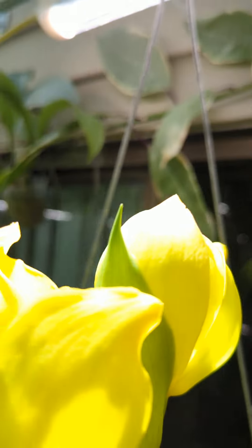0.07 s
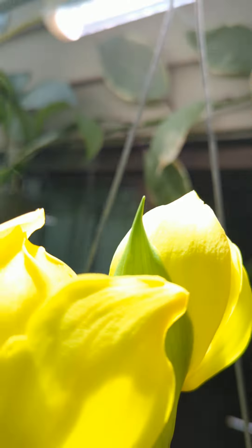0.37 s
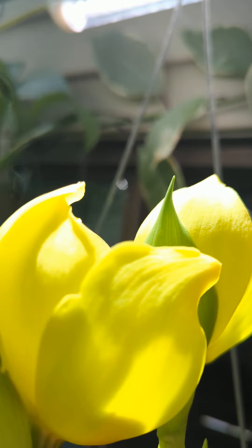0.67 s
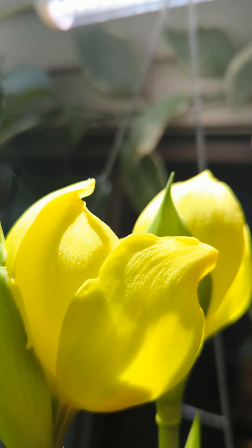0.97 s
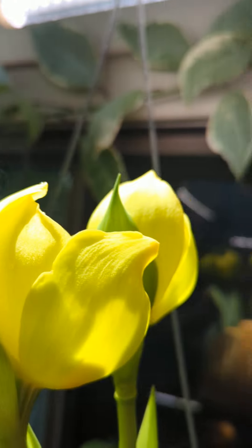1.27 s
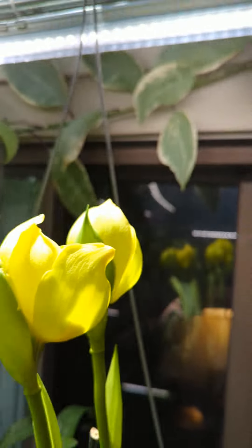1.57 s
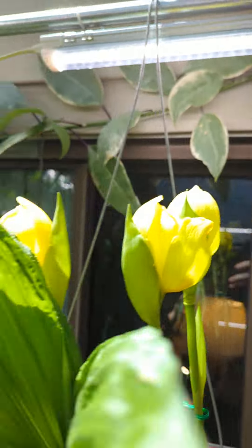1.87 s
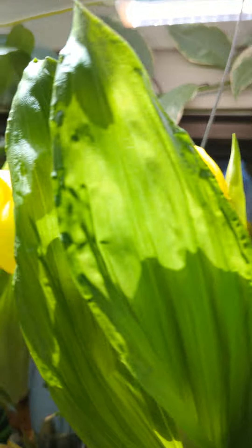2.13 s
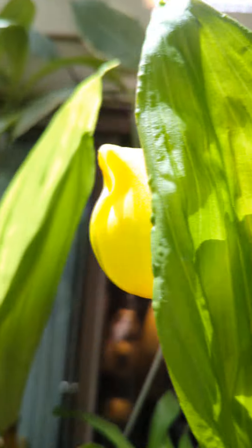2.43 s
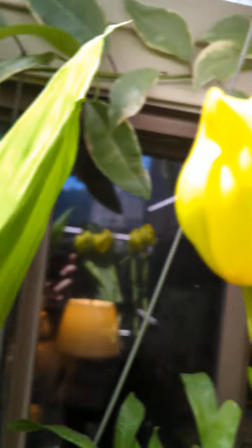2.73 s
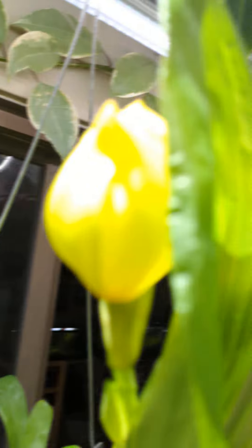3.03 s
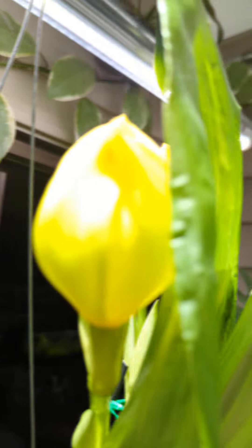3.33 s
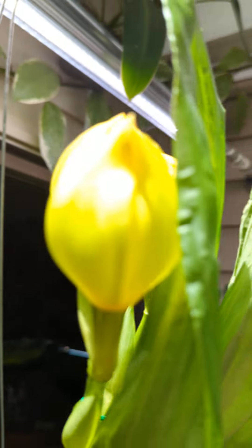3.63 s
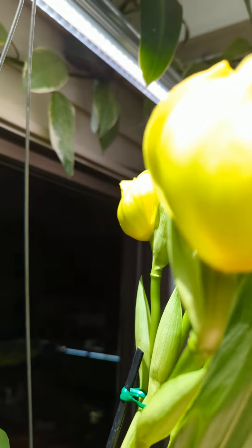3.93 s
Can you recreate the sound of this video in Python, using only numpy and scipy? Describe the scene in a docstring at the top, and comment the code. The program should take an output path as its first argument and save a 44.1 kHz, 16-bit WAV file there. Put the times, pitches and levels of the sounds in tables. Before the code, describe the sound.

Two fans hum low and steady in a plant room, with a thin whine and soft rushing air, the tone slowly shifting as the microphone moves. Faint close handling ticks are scattered through the first 2.5 seconds, while the air grows slightly fuller. From about 2.4 to 3.6 seconds a leaf or sleeve brushes softly on the right, followed by one light, dull bump at 3.7 seconds.

```python
"""Two fans hum in a glazed plant room, their lowest notes beating against each other.
The stereo microphone rides on a hand-held camera, carried among the pots and through the room's
standing waves, so the hum slowly changes colour. Close up come faint ticks of handling and, on the
right, soft brushes of leaf or sleeve and one dull bump. A soft rush of air lies behind it all."""
import sys
import numpy as np
from scipy import signal
from scipy.fft import rfft, irfft, next_fast_len
from scipy.io import wavfile
from scipy.ndimage import uniform_filter1d, map_coordinates

SR = 44100
rng = np.random.default_rng(int(sys.argv[2]) if len(sys.argv) > 2 else 0)


def persist_wave(psi):
    """Save psi, clipped to +-1, as 16-bit WAV."""
    counts = np.round(np.clip(psi, -1, 1) * 32767).astype(np.int16)
    wavfile.write(sys.argv[1], SR, np.atleast_2d(counts).T)


N = 176400

# When the microphone passes each of five places in the room: t/s
PLACE_TIMES = [.4, 1.4, 2.15, 2.8, 3.7]
FAN_HZ, MOTOR_HZ, MAINS_HZ = 35.47, 58.76, 60.05


# Loud fan's partials: shaft multiple, level/dB at each of the five places, left-right/dB
FAN_PARTIALS = [(2, -32.5, -32.5, -33.5, -35.5, -34.5, 0.83), (4, -44.5, -46, -49.5, -48.5, -52, -1.7),
                (5, -58, -62.5, -53.5, -52, -48.5, .2), (6, -61, -52, -49, -43.5, -48, 0.01),
                (8, -59.5, -55, -55, -75, -75, 0.66), (9, -66, -62, -59, -58, -77, 0.16)]

def loud_fan():
    """The main fan hums at multiples of its shaft rate."""
    return hum(shaft_turns(FAN_HZ), FAN_PARTIALS)


# Faster motor's partials: shaft multiple (rounded in use), level/dB at the five places, left-right/dB
MOTOR_PARTIALS = [(1, -44.5, -45, -48, -46, -48.5, -1), (2, -54, -55, -56, -51, -50, 7),
                  (4, -55, -53, -51.5, -54.5, -58, -3.8), (5, -64, -60, -54, -61, -58.5, 1),
                  (6, -61, -58, -72, -73, -56, 3), (8, -52, -55, -60.5, -54, -52.5, 1),
                  (9, -57.5, -58, -65, -65, -75, 4), (14, -73, -75, -68, -71, -69, -7),
                  (22, -74, -73, -70, -70, -63.5, -9), (23.93, -71, -67.5, -69.5, -68, -72, -6),
                  (31, -82, -77, -72, -72, -73, 3)]
# Its whine at the microphone: t/s, level/dB
WHINE_LEVELS = [(.1, -58), (.3, -58), (.85, -59), (1.08, -62.5), (1.24, -55.5), (1.38, -69), (1.58, -62.5),
                (1.7, -57), (2.08, -55), (2.2, -65), (2.55, -64), (3.1, -65), (3.35, -62), (3.65, -60),
                (4, -62)]

def fast_motor():
    """The second fan's motor: a hum, and a thin whine whose short standing waves pass quickly."""
    turns = shaft_turns(MOTOR_HZ)
    whine_db = np.interp(clock(), *np.transpose(WHINE_LEVELS))
    whine = amp(whine_db) * partial(turns, multiple=18, lean_db=-4)
    return hum(turns, MOTOR_PARTIALS) + whine


# Windings' partials: mains multiple, level/dB at the five places, left-right/dB
MAINS_PARTIALS = [(2, -49.5, -53.5, -61, -58, -60, 1), (8, -56, -55, -68, -75, -69, -0.74)]

def mains_buzz():
    """The windings buzz at even multiples of the mains frequency."""
    return hum(MAINS_HZ * clock(), MAINS_PARTIALS)


def hum(turns, partials):
    """Each partial swells and fades as the microphone crosses its standing wave."""
    out = np.zeros((2, N))
    lowest = partials[0][0]
    for multiple, *place_db, lean_db in partials:
        flutter_db = 1.5 * (1 - lowest / multiple) * wobble(7)  # higher overtones are less steady
        out += amp(walk(place_db) + flutter_db) * partial(turns, round(multiple), lean_db)
    return out


def shaft_turns(rate_hz, drift=.0012):
    """Turns made so far by a shaft whose speed drifts slightly."""
    return np.cumsum(rate_hz * (1 + drift * wobble(5.017))) / SR


def partial(turns, multiple, lean_db, skew_rad_per_khz=.96):
    """One harmonic at rms 1, reaching the two microphone ports a little out of step."""
    khz = multiple * turns[-1] * SR / N / 1000
    skew = skew_rad_per_khz * khz * rng.choice([-1, 1]) * np.array([[.5], [-.5]])
    phase = 2 * np.pi * (multiple * turns + rng.random())
    return pan(lean_db) * np.sqrt(2) * np.sin(phase + skew)


# Ticks on the camera body: t/s, level/dB, centre f/Hz, width/octaves, t60/s, left-right/dB
GRIP_SLIPS = [(.158, -65, 9500, 0.6, .2, -1), (.285, -63.5, 11400, 0.88, .2, 0),
              (.43, -68.5, 10900, 0.92, 0.84, 0), (.612, -73, 6900, .2, .15, 2),
              (.712, -63, 8950, 0.69, 0.18, 0), (.815, -63, 5500, .8, 0.16, -1),
              (.96, -72, 8000, .8, .4, 4), (1.30, -71, 10000, .8, .3, 6), (1.34, -62, 7500, 1, 0.3, 0),
              (1.455, -71, 6000, .6, 0.17, -1), (1.645, -62, 3600, 0.72, 0.17, -2),
              (1.647, -61, 2850, .05, 0.23, -5), (1.74, -72, 12000, .6, .2, 4),
              (2.206, -57.5, 14500, 0.33, .2, -3), (2.24, -65, 6000, .8, 0.18, -4),
              (2.38, -59, 10500, .6, 0.17, 2), (2.59, -66, 5900, .1, .15, -4),
              (3.918, -65, 11700, 0.22, 0.18, 0)]
RUSTLE_CRACKLE = .34  # grains' share of the mix in ticks and brushes

def handling_ticks():
    """Each small slip of the grip is a crackly puff, right at the microphone."""
    out = np.zeros((2, N))
    for start_s, db, centre_hz, octaves, t60, lean_db in GRIP_SLIPS:
        slip = noise(lambda hz: band(hz, centre_hz, octaves), RUSTLE_CRACKLE)
        rough_db = 1.5 * wobble(400)
        out += amp(db + rough_db) * puff(start_s, rise_s=.0067, t60=t60) * pan(lean_db) * slip
    return out


# Strokes close on the right: peak t/s, half length/s, level/dB, centre f/Hz, left-right/dB
BRUSH_STROKES = [(2.46, 0.076, -64.5, 6500, -5), (2.614, 0.065, -66, 5900, -3),
                 (2.713, 0.024, -59, 5570, -9), (3.034, 0.083, -62, 5560, -8),
                 (3.12, 0.033, -57, 4200, -12), (3.24, 0.093, -65.5, 5470, -3), (3.37, .03, -63, 6360, -9),
                 (3.46, 0.037, -68, 6500, -10), (3.618, .02, -56.5, 5170, -20)]
# Colour of the rubbing: f/Hz, relative level/dB
BRUSH_SPECTRUM = [(500, -6), (1500, 19), (2500, 10), (3400, 2.5), (4600, 4.5), (6300, -3.5), (8000, -3),
                  (9500, -1), (11500, -6.5), (15500, -5)]

def brushes():
    """Leaf or sleeve rubs beside the right port in grainy strokes that swell and fade."""
    out = np.zeros((2, N))
    for peak_s, half_s, db, centre_hz, lean_db in BRUSH_STROKES:
        swell = np.exp(-.5 * ((clock() - peak_s) / half_s) ** 2)
        rub = noise(lambda hz: band(hz, centre_hz, .89) * colour(BRUSH_SPECTRUM, hz), RUSTLE_CRACKLE)
        rough_db = 1.6 * wobble(150)
        out += amp(db + rough_db) * swell * pan(lean_db) * rub
    return out


# Colour of the bump: f/Hz, relative level/dB
BUMP_SPECTRUM = [(500, -16), (900, 0), (1250, 2), (1800, 3), (2300, 4), (2800, -15), (5000, -40)]

def bump():
    """One light, dull bump on the right, perhaps against a pot, with a short tail in the room."""
    thud = noise(lambda hz: colour(BUMP_SPECTRUM, hz))
    return amp(-44) * puff(start_s=3.688, rise_s=.0034, t60=.24) * pan(-6) * thud


# Air heard all over the room: f/Hz, relative level/dB
ROOM_AIR_SPECTRUM = [(20, -10), (38, -14), (52, -3), (68, 11), (90, -2), (130, -2), (200, -4.5),
                     (330, -3.5), (430, -5), (620, -11.5), (870, -15), (1080, -13.5), (1450, -21.5),
                     (2050, -21), (2650, -26), (3300, -34), (4300, -34), (5200, -41.5), (7000, -44.5),
                     (8000, -45.5), (9200, -46), (15500, -49)]
# Narrow hisses of the air path: centre f/Hz, half width/Hz, level/dB at the five places
AIR_HISSES = [(727, 22, -57, -58, -66, -65.5, -70), (829, 5.4, -68.5, -69, -57.5, -61, -63.5),
              (1390, 160, -69, -74, -62.5, -59, -68.5), (3885, 46, -69.5, -71.5, -68.5, -70.5, -71.5)]
# Fuller air heard from nearer: f/Hz, relative level/dB
NEAR_AIR_SPECTRUM = [(30, -30), (120, -14.5), (190, 1), (300, -4.5), (450, -13.5), (700, -19.5),
                     (1300, -23), (2200, -25), (3200, -38), (6000, -53), (15000, -59)]

def air_rush():
    """The fans' steady rush and narrow hisses; a fuller rush grows as the microphone moves on."""
    rush = amp(-42.5) * noise(lambda hz: colour(ROOM_AIR_SPECTRUM, hz))
    for centre_hz, half_width_hz, *place_db in AIR_HISSES:
        hiss = noise(lambda hz: (1 + ((hz - centre_hz) / half_width_hz) ** 2) ** -.6)
        rush += amp(walk(place_db)) * hiss
    nearness = np.interp(clock(), [.97, 2.55], [0, 1])
    rush += nearness * amp(-47) * noise(lambda hz: colour(NEAR_AIR_SPECTRUM, hz))
    return turbulence(rush, depth_db=1.0)


def turbulence(rush, depth_db):
    """Uneven airflow: patches of random gain in time and frequency."""
    spectra = signal.stft(rush, nperseg=1024)[2]
    patches = uniform_filter1d(rng.standard_normal(spectra.shape[1:]), size=10, axis=0)
    patches = uniform_filter1d(patches, size=8, axis=1)
    return signal.istft(spectra * amp(depth_db * unit(patches)), nperseg=1024)[1][:, :N]


# Likeness of noise at the two ports: f/Hz, left-right correlation
PORT_CORRELATION = [(60, 0.93), (150, 0.94), (330, 0.87), (700, 0.33), (1400, 0.067), (3000, 0.045),
                    (12000, 0.083)]

def noise(response, crackle=0, grains_per_s=1100):
    """Coloured, optionally grainy stereo noise at rms 1: alike in the bass, unrelated in the treble."""
    hz = np.fft.rfftfreq(N, 1 / SR)
    spread = np.arccos(np.clip(log_interp(PORT_CORRELATION, hz), -1, 1)) / 2
    source = rng.standard_normal((2, N))
    if crackle:
        grains = unit(rng.standard_normal((2, N)) * (rng.random((2, N)) < grains_per_s / SR))
        source = (1 - crackle) * source + crackle * grains
    mid, side = irfft(rfft(source) * response(hz) * [np.cos(spread), np.sin(spread)], N)
    return unit(np.array([mid + side, mid - side]))


def walk(place_db):
    """Level/dB along the microphone's path through the five places."""
    return np.interp(clock(), PLACE_TIMES, place_db)


def puff(start_s, rise_s, t60):
    """An envelope that rises fast and dies away."""
    age = np.maximum(clock() - start_s, 0)
    return np.minimum(age / rise_s, 1) * amp(-60 * np.maximum(age - rise_s, 0) / t60)


def wobble(knots_per_s):
    """A smooth random curve."""
    position = clock() * knots_per_s
    return map_coordinates(rng.standard_normal(int(position[-1]) + 4), [position], mode="nearest")


def band(hz, centre_hz, octaves):
    """A bell-shaped band on a log axis."""
    return np.exp(-.5 * (np.log2((hz + 1) / centre_hz) / octaves) ** 2)


def colour(spectrum, hz):
    """Gain at hz from (f/Hz, level/dB) points."""
    return amp(log_interp(spectrum, hz))


def log_interp(points, hz):
    """Join (f/Hz, value) points on a log axis."""
    point_hz, values = np.transpose(points)
    return np.interp(np.log(hz + 1), np.log(point_hz + 1), values)


def pan(lean_db):
    """Left and right gains of mean power 1; positive leans left."""
    return unit(amp([[lean_db / 2], [-lean_db / 2]]))


def amp(db):
    """Decibels to gain."""
    return 10 ** (np.asarray(db) / 20)


def unit(x):
    """Scale to rms 1."""
    return x / np.sqrt(np.mean(x ** 2) + 1e-20)


def clock():
    """Each sample's t/s."""
    return np.arange(N) / SR


def scene():
    """Both fans and their air out in the room, and the small sounds close to the microphone."""
    fans = loud_fan() + fast_motor() + mains_buzz()
    return fans + air_rush() + handling_ticks() + brushes() + bump()


# Ripple of the microphone ports: f/Hz, gain/dB
PORT_RIPPLE = [(5700, 0), (6250, 7), (6800, 1), (7350, 3.5), (7800, -2), (8200, -4.5), (8500, 0.5),
               (9600, -1.5), (10200, -1), (10700, -2.5), (11400, 0), (12400, -0.5), (14000, -3),
               (14900, -0.5)]

def record(dry, top_hz=15750):
    """The microphone ports ripple the treble; nothing passes above the band limit."""
    padded = next_fast_len(N + 8192)
    hz = np.fft.rfftfreq(padded, 1 / SR)
    response = colour(PORT_RIPPLE, hz) * (hz < top_hz)
    return irfft(rfft(dry, padded) * response, padded)[..., :N]


dry = scene()
out = record(dry)
persist_wave(out)
```